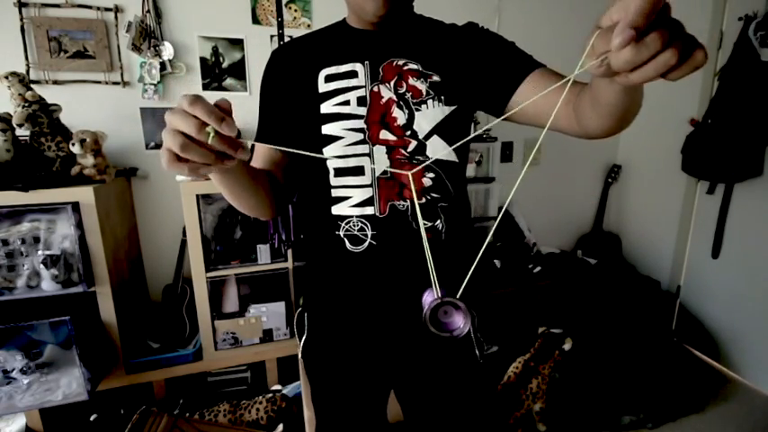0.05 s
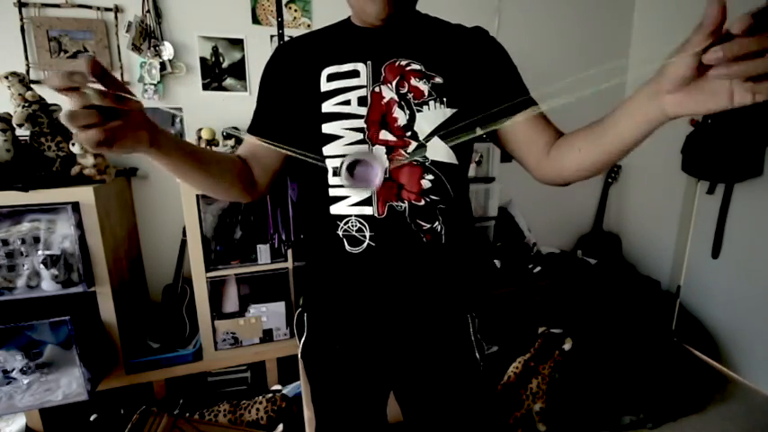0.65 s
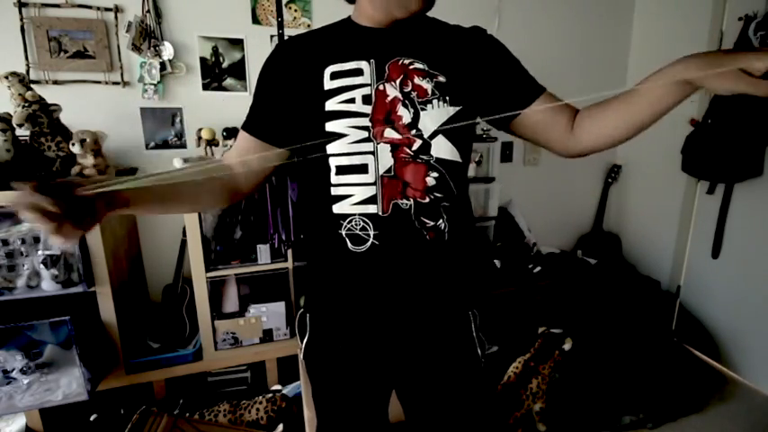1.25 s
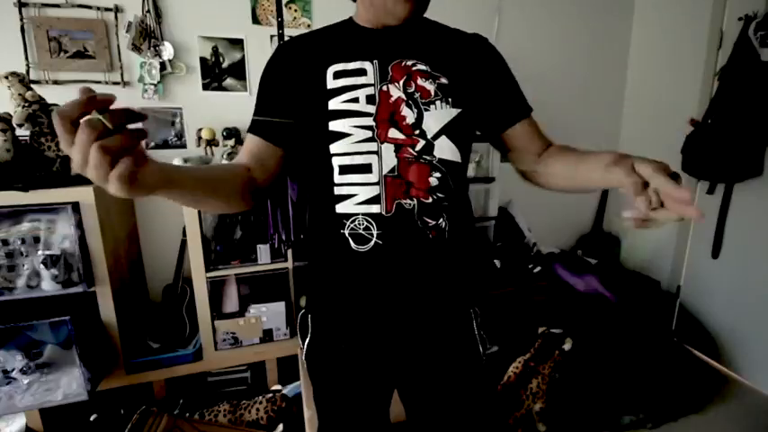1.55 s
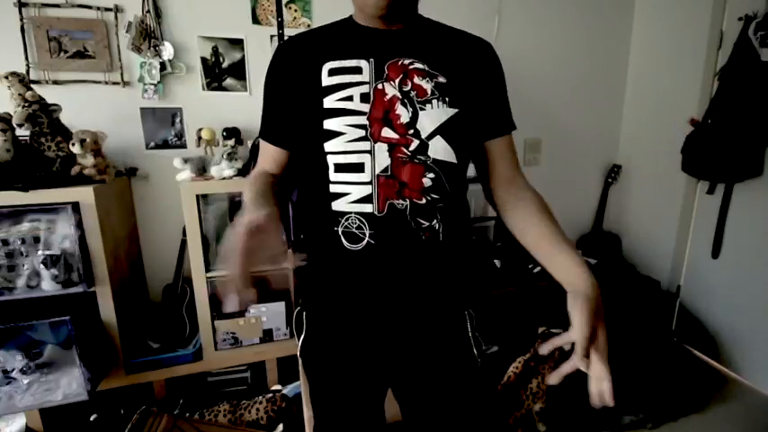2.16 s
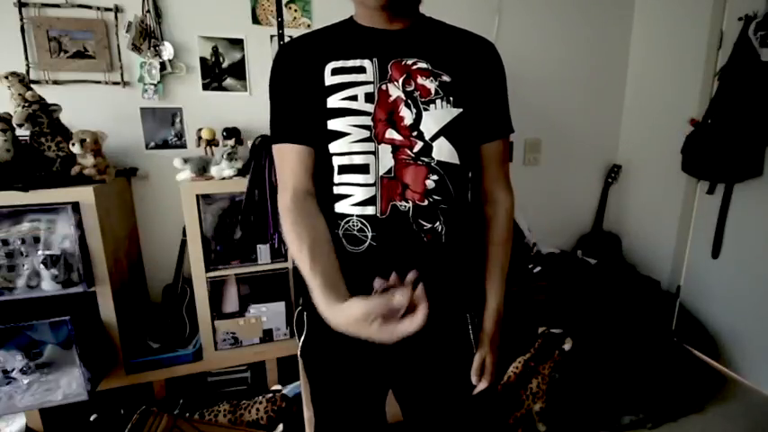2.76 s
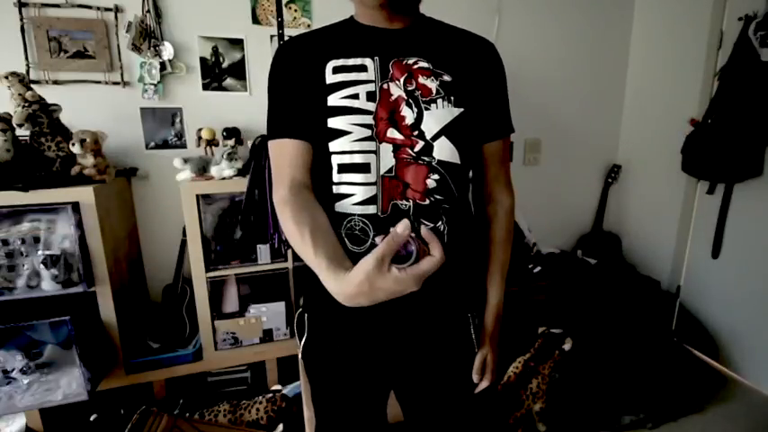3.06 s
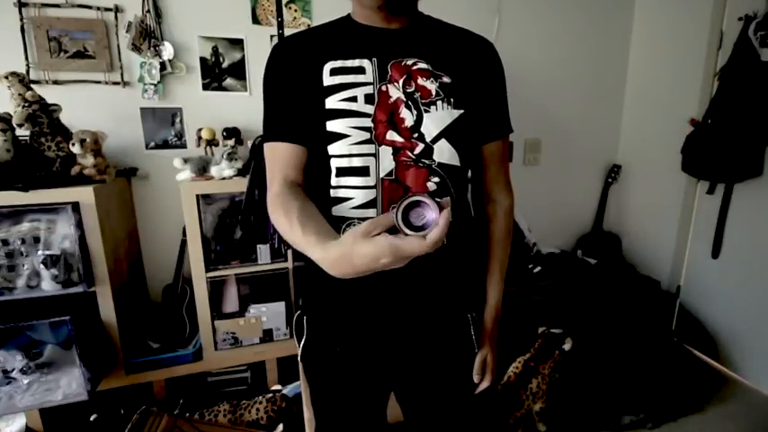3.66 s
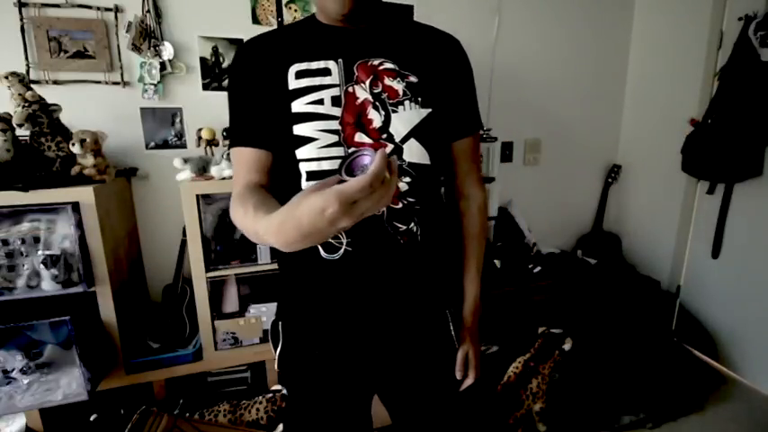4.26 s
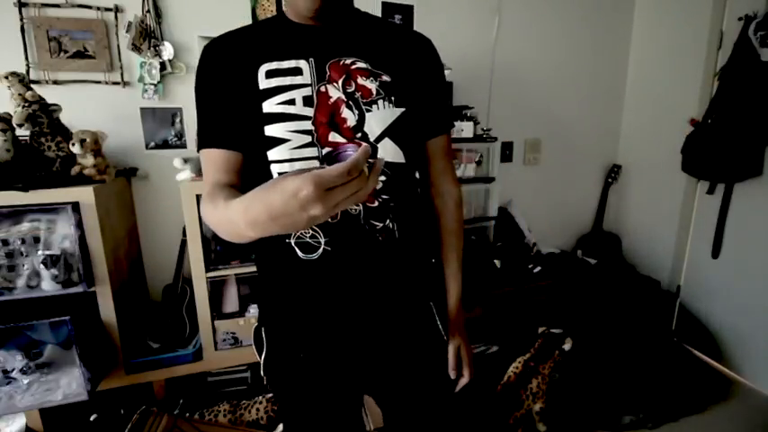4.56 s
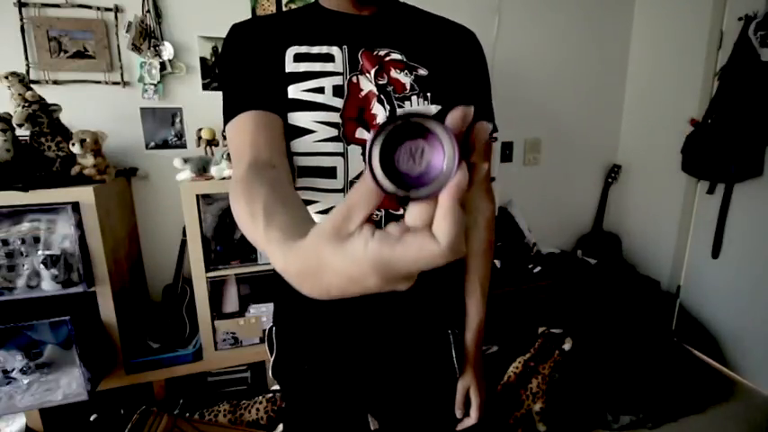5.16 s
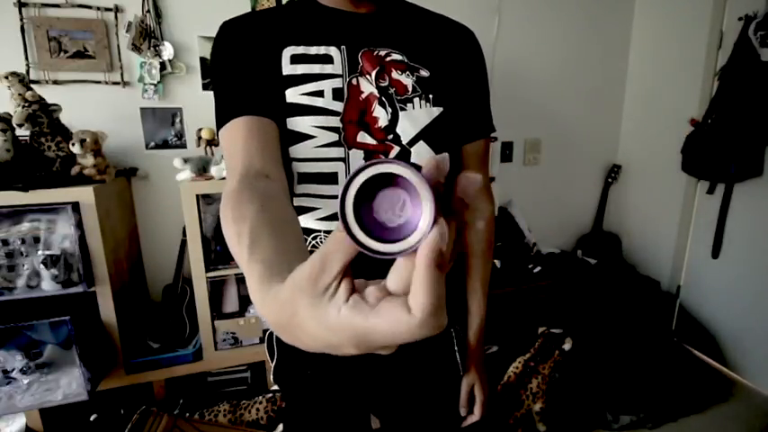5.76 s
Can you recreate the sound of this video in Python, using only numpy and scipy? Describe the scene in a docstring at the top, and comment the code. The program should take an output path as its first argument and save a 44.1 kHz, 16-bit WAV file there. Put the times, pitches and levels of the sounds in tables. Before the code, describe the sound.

A yo-yo whirs softly near the microphone in a small room, with thin string hiss, quick airy swishes and a faint metallic singing. A sharp, ringing snap stands out as the string grabs, followed by a few dull taps as the yo-yo is caught. Then only a muffled engine outside and a few soft shuffling footsteps are heard above faint traffic rumble and hiss.

```python
"""In a small quiet room a metal yo-yo spins on its string. Rolling impacts in the bearing excite a whirr,
the string hisses in the gap and swishes by vortex shedding, and its friction makes the rims sing.
The yo-yo binds with a snap, climbs and lands in a hand; the player takes a few soft steps forward.
Outside an engine drones over distant traffic, and the walls transmit only its lowest firing orders."""
import sys
import numpy as np
from scipy import signal
from scipy.fft import rfft, irfft, next_fast_len
from scipy.io import wavfile
from scipy.ndimage import map_coordinates

SR = 44100
rng = np.random.default_rng(int(sys.argv[2]) if len(sys.argv) > 2 else 0)


def transcribe(u):
    """Save the signal u as a 16-bit wav file named by the first command-line argument.

    u: samples, shape (n,) or (channels, n), limited to [-1, 1]; the rate is SR.
    q: integer samples, one column per channel.
    """
    v = np.clip(np.atleast_2d(u).T, -1, 1)
    q = np.round(v * 32767).astype(np.int16)
    wavfile.write(sys.argv[1], SR, q)


N = 255780
TOP_HZ = 15750

# normal modes of the two metal halves: pitch_hz, relative_db, t60_s
RIM_MODES = [(3510, -9, 0.21), (3668, 1.5, 0.17), (3712, 4, 0.21), (4090, -21, 0.14), (4700, -26, .15),
             (5100, -32, 0.13)]
# left-right coherence of the swinging yo-yo, heard mostly through the room: frequency_hz, coherence
SPIN_COHERENCE = [(300, .05), (1000, .1), (2400, 0.58), (6000, 0.28), (11000, 0.032)]
# left-right coherence of the steps and the reverberation: frequency_hz, coherence
NEAR_COHERENCE = [(200, 0.65), (500, 0.83), (1000, 0.34), (2500, 0.51), (5000, 0.65), (10000, 0.071)]


def amp(db):
    """Decibels to amplitude ratio."""
    return 10 ** (np.asarray(db) / 20)


def unit(x):
    """Normalisation to rms 1."""
    return x / np.sqrt(np.mean(x ** 2) + 1e-20)


def along(points, hz):
    """Interpolation of (frequency_hz, value) points on a log frequency axis."""
    f, v = np.transpose(points)
    return np.interp(np.log(hz + 1), np.log(f + 1), v)


def curves(rows):
    """Linear interpolation in time: one value per sample for each column after the first."""
    s, *cols = np.transpose(rows)
    return [np.interp(np.arange(N) / SR, s, c) for c in cols]


def swells(rows):
    """A sum of Gaussian envelopes, each (peak_s, half_length_s, level_db)."""
    t = np.arange(N) / SR
    return sum(amp(db) * np.exp(-((t - s) / half) ** 2) for s, half, db in rows)


def wobble(rate):
    """Smooth random modulation, rate knots a second."""
    return map_coordinates(rng.standard_normal(int(N * rate / SR) + 4), [np.arange(N) * rate / SR])


def filtered(x, response):
    """Linear filtering: the spectrum of x times a frequency response."""
    m = next_fast_len(N + SR // 2)
    return irfft(rfft(x, m) * response(np.fft.rfftfreq(m, 1 / SR)), m)[..., :N]


def noise(coherence, size=N):
    """White stereo noise whose mid-side balance sets its left-right coherence."""
    m = next_fast_len(size, True)
    turn = np.arccos(np.clip(along(coherence, np.fft.rfftfreq(m, 1 / SR)), -1, 1)) / 2
    mid, side = irfft(rfft(rng.standard_normal((2, m))) * [np.cos(turn), np.sin(turn)], m)[:, :size]
    return np.array([mid + side, mid - side])


def coloured(x, spectrum):
    """Spectral shaping of x, at rms 1."""
    return unit(filtered(x, lambda hz: amp(along(spectrum, hz))))


def resonated(x, peaks):
    """Forced response of parallel damped resonators to x, at rms 1."""
    def response(f):
        return sum(amp(db) * 1j * f * width / (hz * hz - f * f + 1j * f * width)
                   for hz, width, db in peaks)
    return unit(filtered(x, response))


def gliding_band(centre_hz, octaves, skirt_db):
    """Band-pass noise of rms 1 around a centre given for each sample."""
    size = len(centre_hz)
    hz, t, spectra = signal.stft(noise(SPIN_COHERENCE, size), SR, nperseg=512)
    distance = np.log2((hz[:, None] + 1) / np.interp(t * SR, np.arange(size), centre_hz))
    shape = np.exp(-.5 * (distance / octaves) ** 2) + amp(skirt_db) * np.exp(-distance ** 2)
    band = signal.istft(spectra * shape / np.linalg.norm(shape, axis=0), nperseg=512)[1]
    return unit(band[:, :size])


def load(bind_s=2.337, bind_db=-52.5, grab_db_per_s=500, unload_db_per_s=110, release_db_per_s=90):
    """String tension as a gain: it follows the trick, jumps at the bind and decays in the climb."""
    # the string's pull on the bearing: time_s, level_db
    tension = [(0.0, -60), (0.34, -59), (0.44, -87), (0.57, -74), (0.63, -81), (0.7, -59), (0.78, -56.5),
               (0.82, -54.5), (0.96, -70), (1.0, -70), (1.11, -66.5), (1.25, -56.5), (1.47, -53.5),
               (1.66, -59), (1.68, -52), (2.11, -59.5), (2.26, -61.5), (2.3, -60)]
    t = np.arange(N) / SR
    before, after = np.maximum(bind_s - t, 0), np.maximum(t - bind_s, 0)
    trick = amp(curves(tension)[0] - release_db_per_s * after)
    bind = amp(bind_db - grab_db_per_s * before - unload_db_per_s * after)
    return trick + bind


def bearing_whirr(grain_db=3, race_db=-8, race_swell_db=3, whirr_db=-11):
    """Forced vibration: the rattling balls drive the race and the body, which whirrs most in a wobble."""
    # resonances of the race: centre_hz, width_hz, relative_db
    race_modes = [(3690, 74, -12), (4950, 53, -1)]
    # spectrum of the rattling balls: frequency_hz, density_db
    rattle_spectrum = [(200, -15), (500, -1), (1100, -9.5), (2500, -1), (4500, -2.5), (6000, -1),
                       (9000, -9), (15000, -20)]
    # resonances of the body: centre_hz, width_hz, relative_db
    body_modes = [(1034, 9.9, 5), (1133, 17, 2), (1156, 3.4, 8.5)]
    # the body wobbles on a slack string: peak_s, half_length_s, level_db
    wobbles = [(.75, 0.03, -60), (1.07, 0.14, -67.5), (1.4, 0.034, -72), (1.85, 0.049, -52),
               (2.1, 0.085, -63), (2.36, 0.031, -49), (2.465, 0.051, -48)]
    chatter = lambda: noise(SPIN_COHERENCE) * amp(grain_db * wobble(700))
    race = amp(race_db + race_swell_db * wobble(21.95)) * resonated(chatter(), race_modes)
    rattle = coloured(chatter(), rattle_spectrum)
    whirr = resonated(chatter(), body_modes)
    return load() * (rattle + race) + (amp(whirr_db) * load() + swells(wobbles)) * whirr


def string_slide(creep_hz=7900, creep_db=-7, attack_s=0.011, release_s=0.026, octaves_per_s=0.36):
    """Friction noise: the twisted string hisses as it creeps under load, and rises in pitch as it runs."""
    # fast runs through the gap: start_s, length_s, start_pitch_hz, level_db
    runs = [(0, 0.35, 7500, -56.5), (0.691, 0.095, 9100, -61), (0.807, 0.023, 8900, -50),
            (1.252, .16, 8600, -61.5), (1.99, 0.15, 8400, -61)]
    t = np.arange(N) / SR
    out = amp(creep_db) * load() * gliding_band(np.full(N, creep_hz), octaves=0.32, skirt_db=-12)
    for s, length, hz, db in runs:
        envelope = np.exp(-np.maximum(s - t, 0) / attack_s - np.maximum(t - s - length, 0) / release_s)
        centre_hz = hz * 2 ** (octaves_per_s * np.clip(t - s, 0, length))
        out += amp(db) * envelope * gliding_band(centre_hz, octaves=0.18, skirt_db=-12)
    return out


def engine(gain_db=1, waver_rad=0.11, spread_rad=0.28, unsteady_db=1.7):
    """Transmission loss: only the lowest harmonics of the firing rate come through the walls."""
    # the engine coasts down and idles: time_s, firing_hz, relative_db
    coasting = [(0, 40.83, -66), (.35, 40.52, -59.5), (.65, 35.55, -66.5), (1.3, 34.04, -75),
                (2.9, 49.6, -72.5)]
    # it pulls away: time_s, firing_hz, relative_db
    pulling = [(3.1, 62.9, -68), (3.23, 60.96, -58.5), (3.33, 62.4, -63), (3.41, 58.8, -58),
               (3.59, 58.6, -54.5), (3.81, 66.43, -51.5), (4.2, 67.23, -49.5), (4.92, 71.2, -58.5),
               (4.99, 75.6, -59), (5.05, 75.8, -53.5), (5.14, 69.26, -55), (5.52, 67.7, -56.5),
               (5.73, 64.9, -62), (5.8, 63.3, -73)]
    # the throttle, 0 shut to 1 open: time_s, opening
    openings = [(3.2, 0.11), (3.3, 1), (3.5, 0.85), (3.6, 0.1), (3.8, 0.75), (4.45, 0.52), (4.95, 0.77),
                (5.15, 0.32), (5.5, 0.055)]
    # balance of the firing orders at the throttle's extremes: shut_db, open_db
    orders = [(-5, -1), (-2, -23), (-9, -1.5), (-14.5, -5), (-21, -13.5), (-22, -24)]
    # the room favours some low notes: frequency_hz, gain_db
    room_lift = [(35, -8), (54, -9), (61, -2.5), (66, 0), (75, 0.5), (85, 0), (119, 7), (133, 1),
                 (142, 5.5), (170, -12), (187, 8), (200, 1), (280, -3), (420, -2.5)]
    firing_hz, effort_db = curves(list(coasting) + list(pulling))
    throttle = np.clip(curves(openings)[0], 0, 1)
    phase = 2 * np.pi * np.cumsum(firing_hz) / SR + waver_rad * wobble(14)
    out = 0
    for k, (shut_db, open_db) in enumerate(orders, 1):
        source_db = shut_db + throttle * (open_db - shut_db) + unsteady_db * wobble(9.1)
        sides = spread_rad * wobble(3.5) * np.array([[1], [-1]])
        out = out + amp(source_db + along(room_lift, k * firing_hz)) * np.sin(k * phase + sides)
    return amp(effort_db + gain_db) * out


def background(level_db=-54.5):
    """Stationary ambient noise: distant traffic rumble and a steady hiss."""
    # spectrum of the rumble and hiss: frequency_hz, density_db
    spectrum = [(12, -47), (20, -9), (49, -6.5), (150, -7.5), (222, -2.5), (388, -8), (422, -11.5),
                (472, -9), (718, -13), (1000, -12.5), (1330, -14.5), (3740, -15.5), (7520, -20),
                (13900, -26), (16000, -30)]
    # left and right are nearly independent: frequency_hz, coherence
    coherence = [(50, 0.15), (300, 0.073), (1500, 0.04), (5000, 0.031), (12000, 0.047)]
    return amp(level_db) * coloured(noise(coherence), spectrum)


def string_swish(fizz_hz=12900, fizz_db=-11.5):
    """Vortex shedding: the pitch follows the strand's speed, and loose fibres add a high fizz."""
    # strands cut the air: peak_s, half_length_s, centre_hz, glide_octaves_per_s, level_db
    swings = [(.12, 0.16, 2520, 2, -67), (0.75, 0.032, 2620, 6, -48.5), (0.788, 0.015, 1930, -8, -50.5),
              (1.289, 0.057, 2450, -1, -60), (1.46, 0.04, 2500, -1, -49.5), (1.459, 0.079, 1310, 0, -58.5),
              (1.564, .05, 2330, 10.5, -51.5), (1.639, .035, 2880, 0, -50.5),
              (1.684, 0.043, 1510, -1.5, -53), (1.812, .02, 1830, -2.5, -48),
              (1.976, .065, 2450, -1.5, -54)]
    t = np.arange(N) / SR
    envelope = swells([(s, half, db) for s, half, hz, glide, db in swings])
    out = amp(fizz_db) * envelope * gliding_band(np.full(N, fizz_hz), octaves=.17, skirt_db=-9)
    for s, half, hz, glide, db in swings:
        near = np.abs(t - s) < 2.5 * half
        offset_s = t[near] - s
        band = gliding_band(hz * 2 ** (glide * offset_s), octaves=.17, skirt_db=-12)
        out[:, near] += amp(db) * np.exp(-(offset_s / half) ** 2) * band
    return out


def rim_singing(waver_rad=0.61, flutter_db=4.2, loaded_db=-13, swell_db=1.5):
    """Frictional excitation: the rubbing string holds the rim modes in an unsteady ring."""
    # the string rubs the rims: peak_s, half_length_s, level_db
    rubs = [(.13, 0.22, -65.5), (.7, 0.058, -63), (.83, .02, -65), (1.63, 0.03, -59), (1.782, 0.028, -44.5),
            (2.245, 0.027, -59), (2.366, 0.024, -32.5), (2.399, 0.0049, -40), (2.48, 0.054, -55),
            (2.62, .05, -66)]
    t = np.arange(N) / SR
    ring = 0
    for hz, db, _ in RIM_MODES:
        phase = 2 * np.pi * hz * t + waver_rad * wobble(110)
        sides = .5 * np.array([wobble(20), wobble(25)])  # each side receives a different phase
        ring = ring + amp(db + flutter_db * wobble(50)) * np.sin(phase + sides)
    drive = load() * amp(loaded_db + swell_db * wobble(16)) + swells(rubs)
    return drive * unit(ring)


def room(size=16384, rise_s=0.0007):
    """Reverberation: a stereo impulse response in which each frequency decays at its own rate."""
    # reverberation times of the room: frequency_hz, t60_s
    decay_times = [(150, 0.3), (1000, 0.29), (4000, 0.33), (12000, 0.2)]
    hz, t, spectra = signal.stft(noise(NEAR_COHERENCE, size), SR, nperseg=256)
    decay = amp(-60 * t / along(decay_times, hz)[:, None])
    tail = signal.istft(spectra * decay, SR, nperseg=256)[1]
    tail = tail * (1 - np.exp(-np.arange(tail.shape[1]) / SR / rise_s))
    return tail / np.linalg.norm(tail[0])


def impacts(scuff_t60_s=0.072, scuff_rise_s=0.00096, ring_rise_s=0.0014, grip_damping=3.3, echo_db=-3):
    """Impulsive excitation: each contact gives a push, a scuff and a ring of the rims damped by the grip."""
    # the yo-yo meets string or hand; levels are before filtering and mixing:
    # time_s, push_db, contact_sigma_ms, ring_db, scuff_db, scuff_top_hz
    contacts = [(.826, -51, .066, -47, -53, 14000), (1.790, -52, .079, -41, -50, 4000),
                (1.803, -33, 0.31, -57, -39, 4000), (2.332, -46, 0.09, -54, -32.5, 9000),
                (2.3372, -7.5, .036, -27, -31, 15000), (2.358, -38, .11, -36, -40, 12000),
                (2.419, -39, 0.32, -57, -45, 1200), (2.457, -27, 0.021, -50, -53, 14000),
                (2.667, -32, 0.12, -50, -36, 1390), (2.682, -25.5, 0.28, -42, -34.5, 3080),
                (2.688, -31, .015, -44.5, -41.5, 13000), (2.708, -40, 0.22, -41, -37.5, 2210)]
    out = np.zeros((2, N + SR))
    lead = SR // 200
    t = (np.arange(SR // 2) - lead) / SR
    age = np.maximum(t, 0)
    # friction spectrum of string and skin: frequency_hz, density_db
    scuff_spectrum = [(60, -32), (130, -10), (250, -4), (450, -1), (750, -4), (1350, -1), (2000, -3),
                      (2800, -2.5), (4500, -1), (6000, -5.5), (8500, -12), (13000, -7), (15000, -26)]
    friction = coloured(rng.standard_normal(N), scuff_spectrum)
    radiation = signal.butter(2, 140, "high", fs=SR)  # a small body radiates little bass
    for s, push_db, sigma_ms, ring_db, scuff_db, top_hz in contacts:
        pulse = amp(push_db) * np.exp(-.5 * (1000 * t / sigma_ms) ** 2)
        push = signal.lfilter(*radiation, pulse)
        envelope = amp(scuff_db - 60 * age / scuff_t60_s) * (1 - np.exp(-age / scuff_rise_s))
        dulling = signal.butter(2, min(top_hz, TOP_HZ), fs=SR)  # skin is duller than string
        scuff = signal.lfilter(*dulling, envelope * np.roll(friction, rng.integers(N))[:len(t)])
        modes = 0
        for hz, db, t60 in RIM_MODES:
            decay = amp(db + rng.normal(0, 2.3) - 60 * grip_damping * age / t60)
            modes = modes + decay * np.sin(2 * np.pi * hz * age)
        ring = amp(ring_db) * (1 - np.exp(-age / ring_rise_s)) * modes
        echo = signal.fftconvolve((push + scuff + .5 * ring)[None], room(), axes=1)[:, :len(t)]
        start = round(s * SR) - lead
        out[:, start:start + len(t)] += push + scuff + 0.64 * ring + amp(echo_db) * echo
    return out[:, :N]


def footsteps(grain_db=1.0, linger_s=0.036):
    """Sliding friction: soles brush the floor in dull, grainy swells that linger in the room."""
    # soft steps and shuffles: peak_s, level_db, half_length_s
    steps = [(4.567, -51.5, 0.039), (4.933, -50, .003), (4.966, -47, .009), (4.99, -52.5, 0.009),
             (5.119, -52.5, 0.042)]
    # spectrum of a brushing sole: frequency_hz, density_db
    sole_spectrum = [(60, -30), (130, -3), (220, 2), (330, 0), (700, -2), (1300, -5.5), (2200, -11.5),
                     (3300, -8), (4500, -33), (12000, -47)]
    t = np.arange(N) / SR
    envelope = 0
    for s, db, half in steps:
        before, after = np.maximum(s - t, 0), np.maximum(t - s, 0)
        envelope = envelope + amp(db) * np.exp(-(before / half) ** 2 - after / (half + linger_s))
    grains = noise(NEAR_COHERENCE) * amp(grain_db * wobble(300))
    return envelope * coloured(grains, sole_spectrum)


def scene():
    """Superposition of the sources; a level difference swings the yo-yo from side to side."""
    # the yo-yo's place: time_s, left_minus_right_db
    place = [(0, -1.5), (.75, 0), (1.3, -1.5), (1.8, -2), (2.1, 0.5), (2.33, 0.2), (2.7, 0.5)]
    balance = amp(curves(place)[0] * np.array([[.5], [-.5]]))
    yoyo = bearing_whirr() + string_slide() + string_swish() + rim_singing() + impacts()
    return yoyo * balance + footsteps() + engine() + background()


def record(dry):
    """Band limiting: an ideal low-pass filter removes everything above TOP_HZ."""
    return filtered(dry, lambda hz: hz < TOP_HZ)


dry = scene()
out = record(dry)
transcribe(out)
```